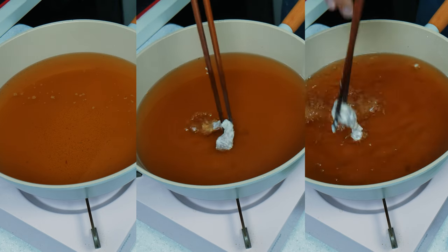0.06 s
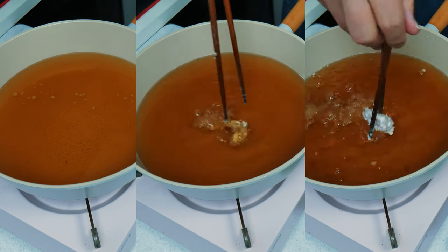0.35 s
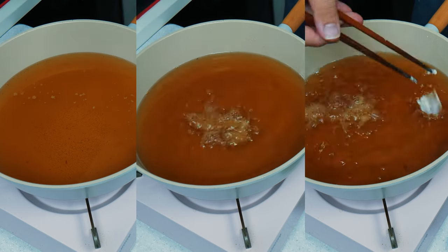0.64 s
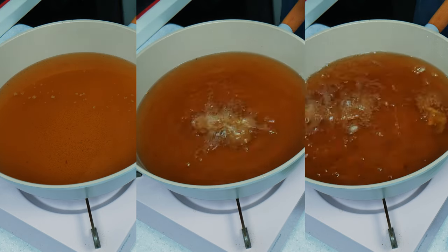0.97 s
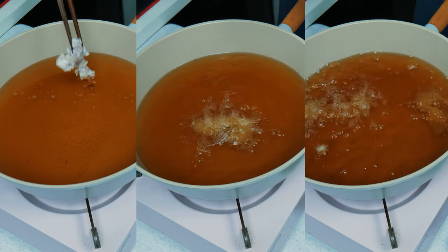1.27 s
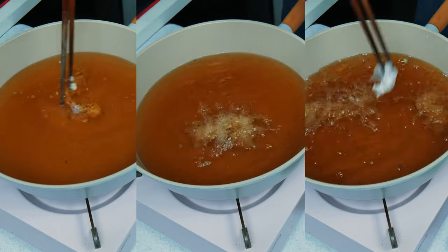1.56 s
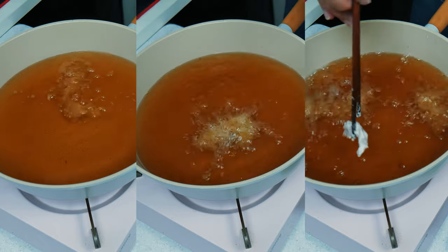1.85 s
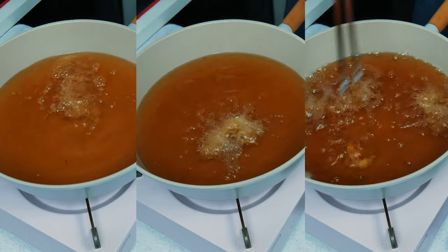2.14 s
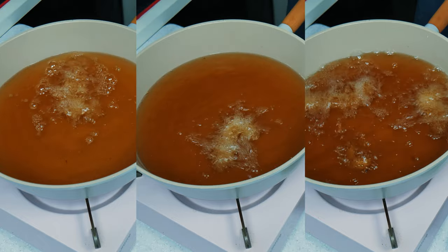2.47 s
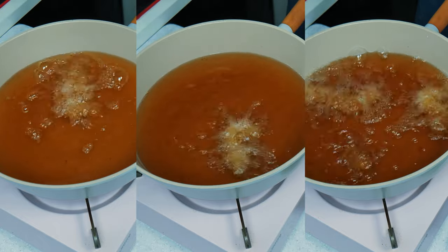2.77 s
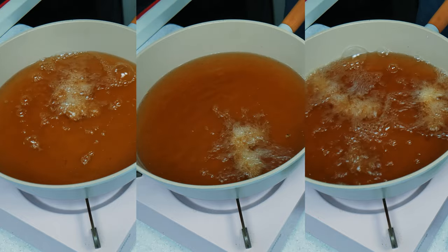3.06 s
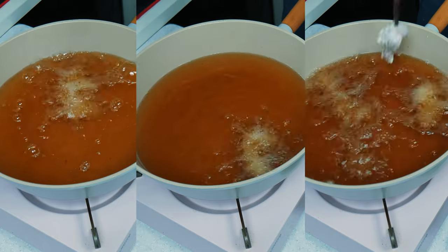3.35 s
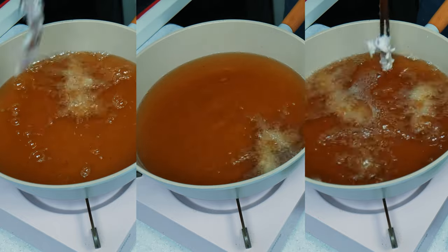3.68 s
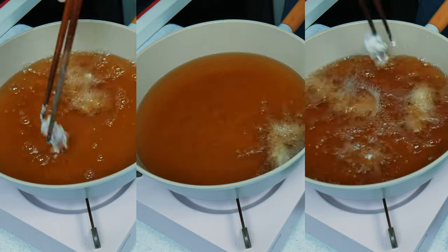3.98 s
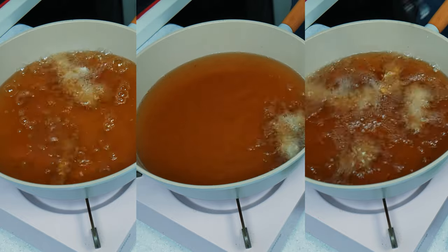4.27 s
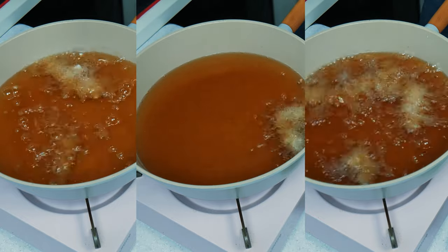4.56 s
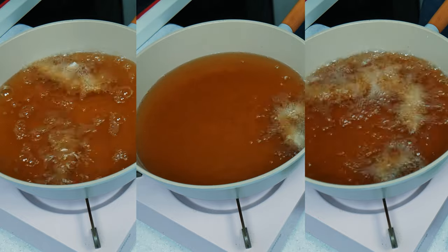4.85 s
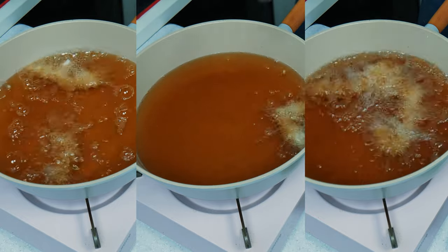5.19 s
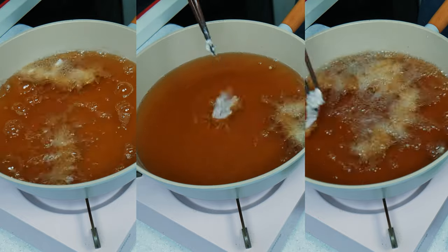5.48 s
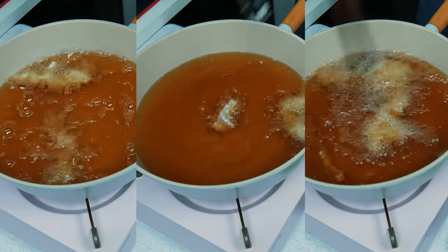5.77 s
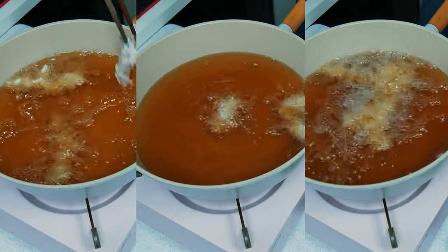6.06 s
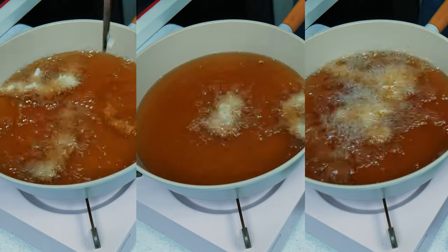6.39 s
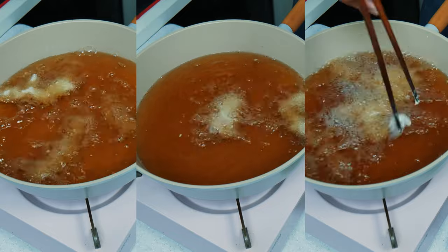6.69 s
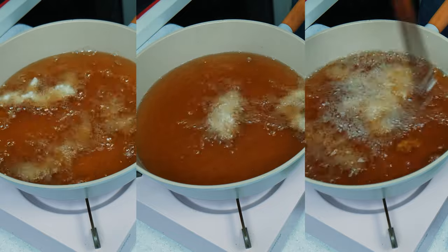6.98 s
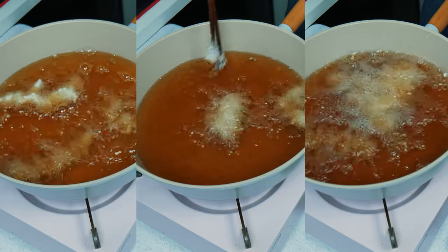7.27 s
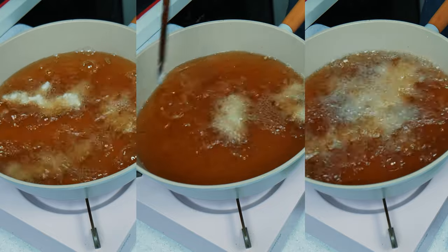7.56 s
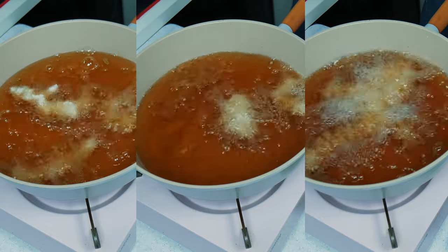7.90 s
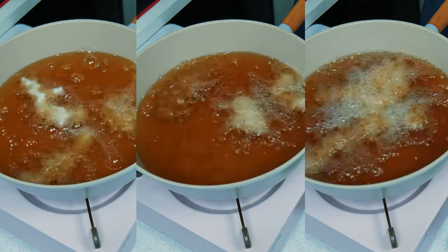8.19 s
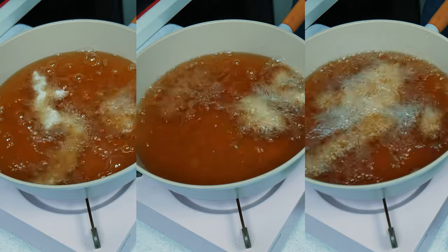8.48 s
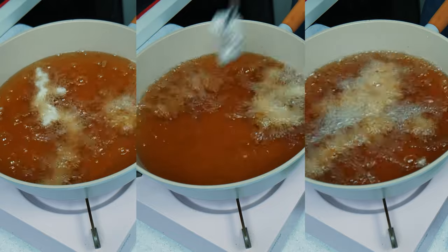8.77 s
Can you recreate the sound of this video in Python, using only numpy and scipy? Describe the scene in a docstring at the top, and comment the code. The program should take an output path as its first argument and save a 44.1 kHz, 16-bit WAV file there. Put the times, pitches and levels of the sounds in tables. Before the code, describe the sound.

Hot oil bubbles and fizzes steadily in a pot, swelling as wet batter drops in, with scattered crackles, spits and small snaps.

```python
"""Dense boiling and fizzing: battered pieces fry in a pot of hot oil, close up and nearly mono.
Steam bubbles burst and ring the pot. Wet batter going in swells the fizz and lets off spurts of
steam. Water drops burst with sharp pops that echo in the pot, blisters snap, cavities ping.
Steam whistles thinly through the first pieces' crust. A stove hums below."""
import sys
import numpy as np
from scipy import signal
from scipy.fft import rfft, irfft, next_fast_len
from scipy.io import wavfile
from scipy.ndimage import uniform_filter1d, map_coordinates

SR = 44100
rng = np.random.default_rng(int(sys.argv[2]) if len(sys.argv) > 2 else 0)


def generate_wav(sig):
    """Save sig (samples, or channels by samples) to the path in sys.argv[1] as 16-bit PCM at SR."""
    pcm = np.round(np.clip(np.atleast_2d(sig).T, -1, 1) * 32767).astype(np.int16)
    wavfile.write(sys.argv[1], SR, pcm)


N = 398663


# boil envelope: t/s, relative level/dB
BOIL_ENVELOPE = [(0.0, -46), (0.17, -46), (0.22, -42.5), (0.4, -42), (0.7, -40.5), (0.95, -43.5),
                 (2.1, -43), (2.17, -42.5), (2.7, -41.5), (3.4, -41.5), (3.72, -42.5), (3.98, -41),
                 (5.5, -41), (5.85, -40.5), (6.87, -40.5), (7.17, -40.5), (8.01, -43), (9.04, -43)]
# spectra of boil, ticks and fizz: f/Hz, relative density/dB
BOIL_SPECTRUM = [(250, -31), (500, -16), (700, -13), (900, -4.5), (1150, -7), (1500, -8.5), (1850, -1),
                 (2080, -3), (2550, -0.5), (3050, -1.5), (3400, -9), (4400, -3.5), (5800, -7), (8000, -7),
                 (10000, -16), (15500, -39)]
TICK_SPECTRUM = [(300, -25.5), (1000, -0.5), (2500, -2.5), (5000, -6), (8000, -2), (10500, -12),
                 (15500, -28)]
FIZZ_SPECTRUM = [(2500, -20.5), (4500, 3), (7000, -2.5), (9000, 0.5), (10400, 5), (11800, 2), (13300, -10),
                 (15700, -16)]
# resonances of pot and fine fizz: f/Hz, width/Hz, gain/dB
POT_MODES = [(810, 35, -6), (935, 60, -5), (1360, 100, -1.5), (1580, 100, -3.5), (1840, 80, -3),
             (1945, 60, -4), (2220, 60, -2), (2375, 50, 0.5), (2525, 75, 0.5), (2640, 85, 2.5),
             (2820, 55, -1.5), (3010, 65, -1), (3120, 65, -1.5), (7640, 90, -2)]
FIZZ_MODES = [(7170, 150, -1), (7650, 100, 3), (8860, 240, 1), (9780, 200, -1), (11400, 480, -2),
              (11750, 310, 2), (12800, 84, 1)]

def frying():
    """Large bubbles boil and ring the pot; the finest fizz where steam leaves the batter in puffs."""
    boil_db, = curves(BOIL_ENVELOPE)
    fizz_db, ring_db = steam_levels_db()
    boil = coloured(bursts(per_s=3500, spread_db=5, echo_db=-2), BOIL_SPECTRUM)
    boil += amp(-4.5) * resonate(bursts(per_s=2500, spread_db=7.5, echo_db=-2.5), POT_MODES)
    boil += amp(-8.5) * pips(count=1500, t60_s=0.04, spread_db=3.8)
    ticks = coloured(bursts(per_s=70, spread_db=3.3, echo_db=-2), TICK_SPECTRUM)
    fizz = coloured(bursts(per_s=12000, spread_db=10, echo_db=0), FIZZ_SPECTRUM)
    ringing = resonate(bursts(per_s=9800, spread_db=14, echo_db=6), FIZZ_MODES)
    puffs = wobble(rate_hz=39)
    mix = (boil * amp(boil_db + 0.18 + 0.6 * wobble(rate_hz=14))
           + ticks * amp(boil_db - 9)
           + fizz * amp(fizz_db + 5.5 + 2.25 * puffs)
           + ringing * amp(ring_db + 0.5 + 1.7 * puffs))
    return pot_echoes(mix, wall_db=-23, wall_t60_s=0.03, room_db=-13, room_t60_s=0.22)


# wet pieces entering the oil: t/s, sink time/s, relative fizz level/dB, relative ring level/dB
PIECES = [(0.16, 0.21, -50.5, -39), (0.8, 0.14, -50, -43), (2.13, 0.026, -50, -41), (3.5, 0.28, -56, -41.5),
          (4.1, 0.27, -52, -43.5), (5.49, 0.12, -48, -43), (6.9, .06, -74, -53)]

def steam_levels_db():
    """Fizz and ring envelopes: a piece's wet skin flashes off and dries; inner moisture lingers."""
    hold_s, fade_db_per_s = 0.034, 13.5
    linger_db, linger_fade_db_per_s = -8, 4
    t = np.arange(N) / SR
    fizz_power, ring_power = amp(-63.5) ** 2, amp(-55.5) ** 2  # crumbs already in the oil
    for start_s, sink_s, fizz_db, ring_db in PIECES:
        immersed = np.clip((t - start_s) / sink_s, 0, 1)
        drying_s = np.maximum(t - start_s - sink_s - hold_s, 0)
        skin = amp(-fade_db_per_s * drying_s) ** 2
        inside = amp(linger_db - linger_fade_db_per_s * drying_s) ** 2
        flow = immersed * (skin + inside)
        fizz_power += flow * amp(fizz_db) ** 2
        ring_power += flow * amp(ring_db) ** 2
    return 10 * np.log10(fizz_power), 10 * np.log10(ring_power)


def bursts(per_s, spread_db, echo_db):
    """Tiny bubbles burst at random, each elsewhere in the pot and so with its own echoes."""
    sizes = amp(spread_db * np.minimum(rng.standard_normal(N), 2.5))
    direct = unit((rng.random(N) < per_s / SR) * sizes * rng.choice([-1, 1], N))
    t = np.arange(SR // 10) / SR
    echo_power = np.abs(signal.fftconvolve(direct ** 2, decay(t, t60_s=0.042) ** 2)[:N])
    echoes = unit(np.sqrt(echo_power) * rng.standard_normal(N))
    return unit(direct + amp(echo_db) * echoes)


# bubble strength by pitch: f/Hz, relative level/dB
PIP_LEVELS = [(700, -9), (1000, -4), (2500, -0.5), (3600, -3), (5000, 1), (6000, -36)]

def pips(count, t60_s, spread_db):
    """Single bubbles of all sizes ring long enough to have a pitch."""
    when, place = rng.random((2, count, 1))
    low_hz, high_hz = PIP_LEVELS[0][0], PIP_LEVELS[-1][0]
    hz = low_hz * (high_hz / low_hz) ** place
    t = np.arange(SR // 25) / SR
    size_db = along(PIP_LEVELS, hz) + spread_db * np.minimum(rng.standard_normal((count, 1)), 2)
    rings = amp(size_db) * decay(t, t60_s) * np.sin(2 * np.pi * hz * t)
    index = (when * N).astype(int) + np.arange(len(t))
    return unit(np.bincount(index.ravel(), rings.ravel(), N)[:N])


# bursting water drops: t/s, relative peak/dB, f/Hz, relative crack level/dB
DROP_POPS = [(0.1445, -23.5, 8700, -6), (0.7746, -25, 11700, -28), (0.782, -25, 11800, -26),
             (2.139, -21, 11800, -8), (2.151, -27, 11800, -12), (2.561, -19, 10950, -16),
             (3.5575, -29, 11700, -20), (4.144, -10.5, 12200, -21), (4.517, -19.5, 11600, -20),
             (4.57, -13.5, 11800, -36), (4.8575, -29, 11900, -15), (4.8835, -28, 11900, -26),
             (4.908, -13, 12040, -25), (5.2273, -13.5, 7570, -20.5), (5.4025, -22.5, 7870, -9),
             (5.499, -20.5, 11600, -8), (5.553, -22, 10900, -14), (5.6075, -21, 11700, -26),
             (5.616, -21, 11400, -20), (5.623, -19, 12300, -6), (6.1805, -32, 11800, -24),
             (6.385, -22, 11800, -27), (6.5202, -16, 11650, -33), (6.5845, -31, 11800, -14),
             (6.691, -19.5, 11700, -18), (6.81, -22, 13600, -16), (6.9578, -17.5, 11500, -5),
             (6.97, -14.5, 11800, -20), (7.006, -23, 12000, -19), (7.0535, -27, 11800, -26),
             (7.725, -20, 12500, -20), (8.3595, -32, 12300, -22), (8.384, -30, 12300, -24),
             (8.4285, -32, 12300, -22), (8.6348, -14, 12100, -29.5), (8.654, -24, 12800, -30),
             (8.8315, -35, 12200, -20), (8.913, -21.5, 12000, -7), (8.958, -28, 12600, -8)]

def pops():
    """A drop flashes to steam: a crack, and a tiny cavity that rings for a few milliseconds."""
    track, t = np.zeros(N), np.arange(SR // 6) / SR
    faint = strays(count=5, from_s=3.5, db=-33, spread_db=1, hz=11900, scatter=0.06)
    faint_crack_db = -15
    for start_s, db, hz, crack_db in DROP_POPS + [(*row, faint_crack_db) for row in faint]:
        ring = unit(np.sin(2 * np.pi * hz * t) * decay(t, t60_s=0.005))
        flash = rng.standard_normal(len(t)) * decay(t, t60_s=0.00098)
        crack = bandpass(flash, hz, width_hz=6500)
        burst = bandpass(ring + amp(crack_db + 14) * crack, hz, width_hz=16000)
        pop = pot_echoes(burst, wall_db=0.5, wall_t60_s=0.014, room_db=-2, room_t60_s=0.088)
        add(track, start_s, at_peak(pop, db - 3))
    return track


# blisters breaking at the surface: t/s, relative peak/dB, f/Hz
BLISTER_SNAPS = [(2.5605, -22, 3900), (3.131, -24, 5400), (3.207, -25, 1306), (3.271, -28, 1900),
                 (3.708, -22, 4200), (3.816, -23.5, 2780), (3.897, -23, 2610), (4.557, -22, 2600),
                 (4.606, -25, 2760), (4.649, -23, 3580), (4.999, -22.5, 2500), (5.2275, -24, 4700),
                 (5.499, -19, 5000), (5.839, -18, 2610), (6.015, -22.5, 2590), (6.34, -22, 1410),
                 (6.7075, -24, 6000), (6.726, -28, 1250), (6.9345, -23, 4600), (6.955, -20, 2450),
                 (7.039, -23, 2630), (7.238, -24, 1410), (7.274, -16.5, 2700), (7.4965, -25, 6500),
                 (7.5185, -24, 8200), (7.892, -20.5, 2400), (8.0355, -18, 2200), (8.0665, -26, 7700),
                 (8.1485, -27, 6500), (8.224, -22.5, 2400), (8.276, -24, 2990), (8.421, -27, 2410),
                 (8.601, -25, 2400), (8.6595, -21.5, 4600), (8.6745, -24, 6400), (8.733, -25, 5000),
                 (8.735, -17.5, 2900), (8.737, -19.5, 3800), (9.024, -25, 1400)]

def snaps():
    """A blister breaks with a click; the collapsing cavity rings briefly on an unsteady pitch."""
    track, t = np.zeros(N), np.arange(SR // 6) / SR
    faint = strays(count=7, from_s=3, db=-28, spread_db=1.5, hz=2700, scatter=0.18)
    for start_s, db, hz in BLISTER_SNAPS + faint:
        click = bandpass(t == 0, hz, width_hz=3600)
        click = bandpass(click, hz, width_hz=4000)
        waver_rad = 0.9 * unit(uniform_filter1d(rng.standard_normal(len(t)), size=SR // 1000))
        cavity = np.sin(2 * np.pi * hz * t + waver_rad) * decay(t, t60_s=0.014)
        burst = click + amp(-5) * bandpass(cavity, hz, width_hz=2000)
        snap = pot_echoes(burst, wall_db=-1, wall_t60_s=0.0094, room_db=-3.5, room_t60_s=0.1)
        add(track, start_s, at_peak(snap, db - 9))
    return track


# steam jets from wet batter: t/s, level/dB, length/s, f/Hz
STEAM_SPURTS = [(0.15, -44, .03, 8000), (0.198, -35.5, 0.027, 9000), (0.273, -34.5, 0.015, 10500),
                (0.352, -31, 0.041, 10100), (0.501, -28.5, 0.035, 8900), (0.773, -35, .018, 11500),
                (2.146, -33, 0.028, 12000), (2.194, -31, .016, 12000), (3.824, -32.5, 0.021, 11400),
                (3.898, -36, .03, 9000), (3.984, -33, .015, 9000), (3.988, -24, 0.02, 8650),
                (4.011, -32.5, 0.059, 6100), (5.622, -28, 0.012, 7100), (5.717, -32, 0.037, 11800),
                (6.971, -31, 0.022, 14000)]

def spurts():
    """A jet of steam swells and dies as a broad, grainy hiss, with bubbles ringing round it."""
    track, t = np.zeros(N), np.arange(SR // 4) / SR
    for start_s, db, length_s, hz in STEAM_SPURTS:
        grains = rng.standard_normal(len(t)) * amp(4 * rng.standard_normal(len(t)))
        hiss = bandpass(grains, hz, width_hz=7100)
        hiss = bandpass(hiss, hz, width_hz=7100)
        bubbles = bandpass(rng.standard_normal(len(t)), hz=5040, width_hz=250)
        rise_s = length_s / 3
        envelope = t / rise_s * np.exp(1 - t / rise_s)
        add(track, start_s, amp(db) * envelope * (hiss + amp(-11.5) * bubbles))
    return track


# clearly pitched cavities: t/s, level/dB, f/Hz, t60/s
CAVITY_PINGS = [(0.207, -25.5, 2800, 0.035), (2.373, -29, 9050, 0.057), (2.414, -38.5, 936, .12),
                (4.557, -30, 5970, .045), (5.403, -36, 7650, .04), (5.4985, -28, 5000, .035),
                (5.558, -31, 7700, .07), (5.628, -29, 6340, .022)]

def pings():
    """A cavity opens and rings on one slightly wavering note."""
    attack_s = 0.0031
    track, t = np.zeros(N), np.arange(SR // 6) / SR
    for start_s, db, hz, t60_s in CAVITY_PINGS:
        waver_rad = 0.61 * wobble(rate_hz=250)[:len(t)]
        envelope = amp(db) * decay(t, t60_s) * (1 - np.exp(-t / attack_s))
        add(track, start_s, envelope * np.sqrt(2) * np.sin(2 * np.pi * hz * t + waver_rad))
    return track


# like-sized bubbles round a piece: t/s, length/s, level/dB, first f/Hz, last f/Hz, scatter of ln f
BUBBLE_SWARMS = [(0, 3.17, -55, 1007, 844, 0.053), (0.5, 1.4, -51.5, 2820, 2680, 0.022),
                 (0.36, .09, -44, 4700, 4750, .03), (2.143, .085, -40.5, 4550, 4850, 0.03),
                 (4.28, .22, -49, 5650, 5750, .025), (1.9, .6, -53, 930, 910, .03),
                 (2.2, 1.2, -51.5, 1550, 980, 0.08), (5.5, 3.6, -50, 4330, 4700, 0.048),
                 (5.5, 1.0, -49.5, 1450, 860, 0.12), (0.36, .12, -46, 1700, 1500, .2),
                 (2.14, .2, -47, 2350, 2250, .07), (5.62, .16, -45, 1900, 1650, .12),
                 (5.78, .2, -42, 2200, 1900, 0.2), (5.76, .7, -46.5, 1420, 1320, .04),
                 (5.9, .7, -45, 2520, 2500, .03), (7.12, .3, -46, 2480, 2560, .035),
                 (7.12, .32, -47, 1480, 1450, .06), (7.5, 2.4, -49.5, 1480, 1490, 0.074)]

def swarms():
    """Each bubble rings near its swarm's pitch; the more alike the bubbles, the longer they ring."""
    track, count, t = np.zeros(N), 1800, np.arange(SR // 50) / SR
    for start_s, length_s, db, first_hz, last_hz, scatter in BUBBLE_SWARMS:
        age = rng.random((count, 1))
        detune, size = rng.standard_normal((2, count, 1))
        hz = first_hz * (last_hz / first_hz) ** age * np.exp(scatter * detune)
        strength = amp(4.3 * size) * rng.choice([-1, 1], (count, 1))
        rings = strength * decay(t, t60_s=1.4 / (hz * scatter)) * np.sin(2 * np.pi * hz * t)
        index = (age * length_s * SR).astype(int) + np.arange(len(t))
        swarm = unit(np.bincount(index.ravel(), rings.ravel()))
        envelope = np.interp(np.linspace(0, 1, len(swarm)), [0, 0.1, 0.7, 1], [0, 1, 0.8, 0])
        add(track, start_s, amp(db) * envelope * swarm)
    return filtered(track, lambda hz: 1 - np.exp(-(hz / 600) ** 4))  # small bubbles radiate no bass


# steam through the first pieces' crust: t/s, f/Hz, level/dB
WHISTLE_PATH = [(0.1, 4980, -55), (0.3, 4970, -46), (0.52, 4960, -53), (0.62, 5020, -53), (1.0, 5000, -52),
                (1.55, 5000, -54), (2.12, 5050, -50), (2.2, 5090, -46), (2.6, 5090, -50.5),
                (3.1, 5110, -53), (3.8, 5160, -47), (4.35, 5200, -52), (4.8, 5090, -47.5), (5.2, 5000, -66)]

def whistle():
    """A crowd of nearly equal bubbles rings in one flickering band that drifts slowly in pitch."""
    hz, db = curves(WHISTLE_PATH)
    core = wobble(rate_hz=170) + 1j * wobble(rate_hz=170)
    skirt = wobble(rate_hz=440) + 1j * wobble(rate_hz=440)
    band = (core + amp(-1.5) * skirt) * np.exp(2j * np.pi * np.cumsum(hz) / SR)
    flicker_db = 2.2 * wobble(rate_hz=30)
    return amp(db) * unit(band.real * amp(flicker_db))


# finest surface bubbles: f/Hz, relative density/dB
SIMMER_SPECTRUM = [(5000, -23), (10000, -1), (14000, 1), (15800, -6)]

def simmer():
    """The smallest bubbles sizzle faintly and steadily all over the surface."""
    return amp(-51) * coloured(bursts(per_s=11000, spread_db=5, echo_db=-4), SIMMER_SPECTRUM)


# stove rush: f/Hz, relative density/dB
STOVE_SPECTRUM = [(13, -51), (22, -32), (86, -10), (125, -8), (162, -4.5), (214, -5.5), (339, 3),
                  (474, -4.5), (524, 1.5), (700, -5), (910, -25), (1540, -120)]
# stove hum: f/Hz, level/dB
HUM_LINES = [(120, -74.5), (139, -74.5)]

def stove():
    """A low rush with two wavering hum lines."""
    hum, t = np.zeros(N), np.arange(N) / SR
    for hz, db in HUM_LINES:
        waver_rad = 1.44 * wobble(rate_hz=6.1)
        hum += amp(db) * np.sqrt(2) * np.sin(2 * np.pi * hz * t + waver_rad)
    return hum + amp(-57.5) * coloured(rng.standard_normal(N), STOVE_SPECTRUM)


def pot_echoes(x, wall_db, wall_t60_s, room_db, room_t60_s):
    """Add quick echoes between the pot's walls and a longer kitchen tail."""
    t = np.arange(SR // 6) / SR
    response = np.zeros(len(t))
    for db, t60_s in (wall_db, wall_t60_s), (room_db, room_t60_s):
        tail = rng.standard_normal(len(t)) * decay(t, t60_s) * (t > 0.0005)
        response += amp(db) * unit(tail) / np.sqrt(len(t))
    response[0] = 1  # direct sound
    return signal.fftconvolve(x, response)[:len(x)]


def strays(count, from_s, db, spread_db, hz, scatter):
    """Loosely spaced bursts as rows of t/s, relative peak/dB, f/Hz."""
    times_s = from_s + (N / SR - from_s) * (np.arange(count) + rng.random(count)) / count
    return [(start_s, db + spread_db * size, hz * np.exp(scatter * detune))
            for start_s, (size, detune) in zip(times_s, rng.standard_normal((count, 2)))]


def amp(db):
    """Decibels to gain."""
    return 10 ** (np.asarray(db) / 20)


def decay(t, t60_s):
    """Fall by 60 dB every t60_s."""
    return amp(-60 * t / t60_s)


def unit(x):
    """Scale to rms 1."""
    return x / np.sqrt(np.mean(x ** 2) + 1e-20)


def at_peak(x, db):
    """Scale the loudest 2 ms to the given level."""
    return amp(db) * x / np.sqrt(uniform_filter1d(x ** 2, size=SR // 500).max())


def along(points, hz):
    """Interpolate (f/Hz, value) points on a log axis."""
    f, values = np.transpose(points)
    return np.interp(np.log(hz + 1), np.log(f + 1), values)


def curves(rows):
    """One value per sample for each column after t/s."""
    times_s, *columns = np.transpose(rows)
    return [np.interp(np.arange(N) / SR, times_s, column) for column in columns]


def wobble(rate_hz):
    """Smooth random curve, rate_hz knots a second."""
    knots = rng.standard_normal(int(N * rate_hz / SR) + 4)
    return map_coordinates(knots, [np.arange(N) * rate_hz / SR])


def filtered(x, response):
    """Apply a complex frequency response."""
    size = next_fast_len(len(x) + SR // 10)
    return irfft(rfft(x, size) * response(np.fft.rfftfreq(size, 1 / SR)), size)[:len(x)]


def coloured(x, spectrum):
    """Minimum-phase filter with the given spectrum; output rms 1."""
    size = 4096
    gain = amp(along(spectrum, np.fft.rfftfreq(size, 1 / SR)))
    cepstrum = irfft(np.log(gain + 1e-6))
    cepstrum[1:size // 2] *= 2
    cepstrum[size // 2 + 1:] = 0
    response = irfft(np.exp(rfft(cepstrum)))
    return unit(signal.fftconvolve(x, response)[:len(x)])


def resonate(x, modes):
    """Parallel resonances (f/Hz, width/Hz, gain/dB); output rms 1."""
    def response(f):
        return sum(amp(db) * 1j * f * width_hz / (hz * hz - f * f + 1j * f * width_hz)
                   for hz, width_hz, db in modes)
    return unit(filtered(x, response))


def bandpass(x, hz, width_hz):
    """One resonance; output rms 1."""
    return resonate(x, [(hz, width_hz, 0)])


def add(track, start_s, sound):
    """Mix a sound into the track."""
    start = max(0, round(start_s * SR))
    track[start:start + len(sound)] += sound[:N - start]


# stereo width: f/Hz, side gain/dB
STEREO_WIDTH = [(60, -17), (110, -26), (200, -22.5), (380, -23), (700, -23.5), (1290, -45.5), (2380, -56),
                (4400, -48.5), (8120, -36.5), (15000, -27.5)]

def scene():
    """All sources centred, with a faint diffuse difference between the channels."""
    mid = frying() + simmer() + swarms() + whistle() + spurts() + pops() + snaps() + pings() + stove()
    t = np.arange(SR // 10) / SR
    tail = rng.standard_normal(len(t)) * decay(t, t60_s=0.03)
    phase_rad = np.angle(rfft(np.pad(tail, (len(t), 0))))
    allpass = irfft(np.exp(1j * phase_rad))
    diffuse = signal.fftconvolve(mid, allpass, mode="same")
    side = filtered(diffuse, lambda hz: amp(along(STEREO_WIDTH, hz)))
    return np.array([mid + side, mid - side])


def record(dry):
    """Steep low-pass on each channel."""
    cutoff_hz = 15900
    return np.array([filtered(channel, lambda hz: 1 / (1 + (hz / cutoff_hz) ** 200)) for channel in dry])


dry = scene()
out = record(dry)
generate_wav(out)
```